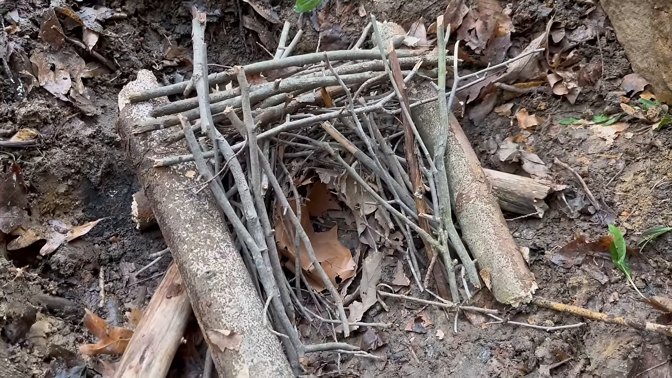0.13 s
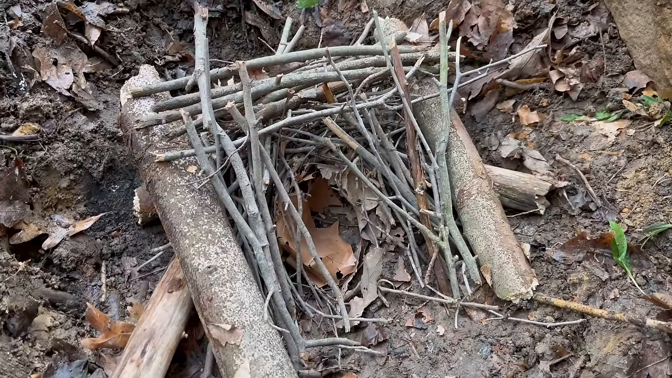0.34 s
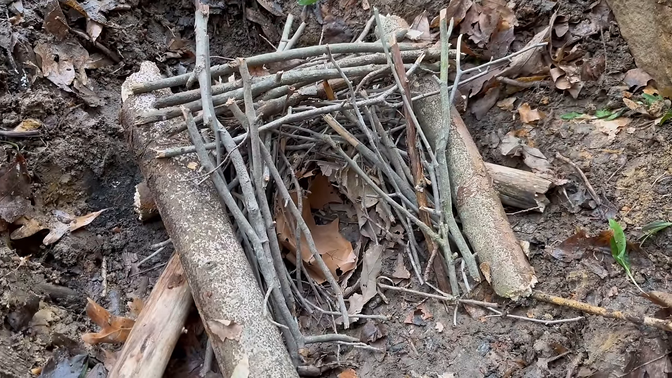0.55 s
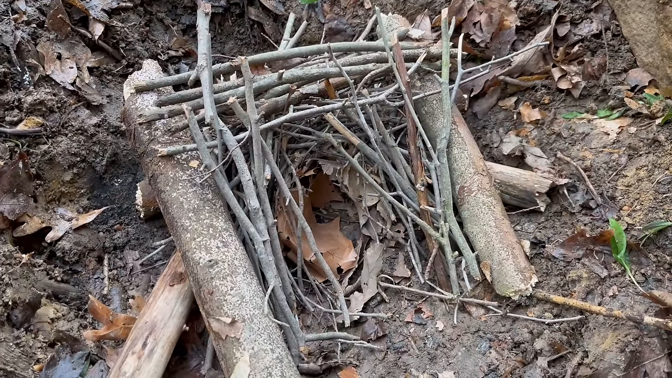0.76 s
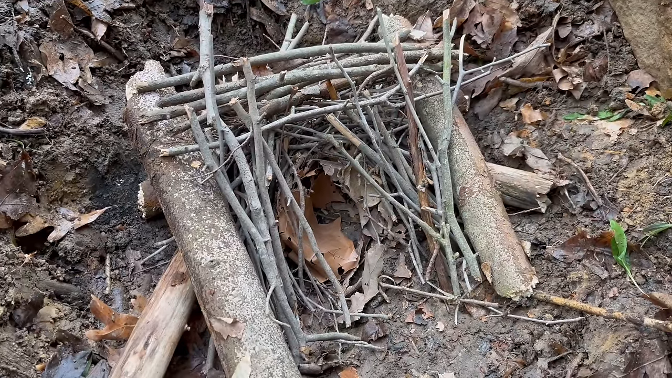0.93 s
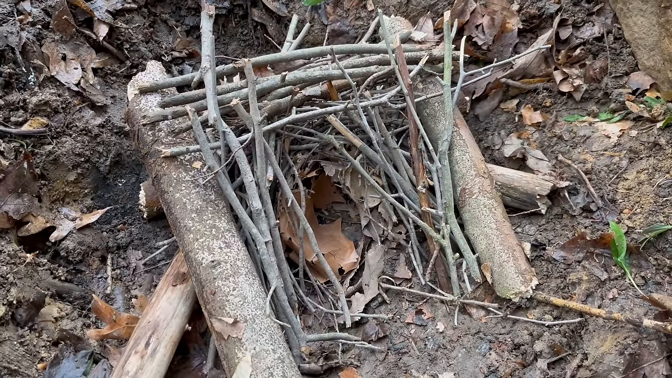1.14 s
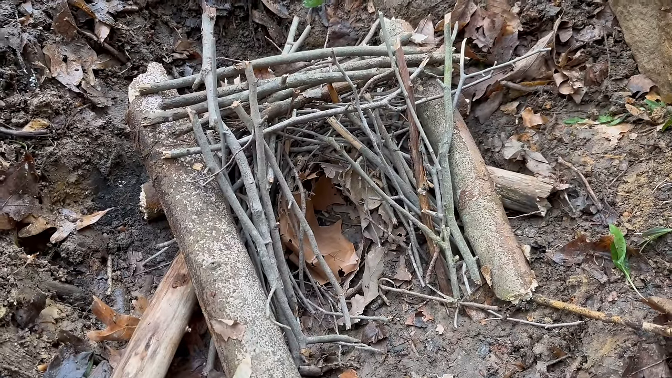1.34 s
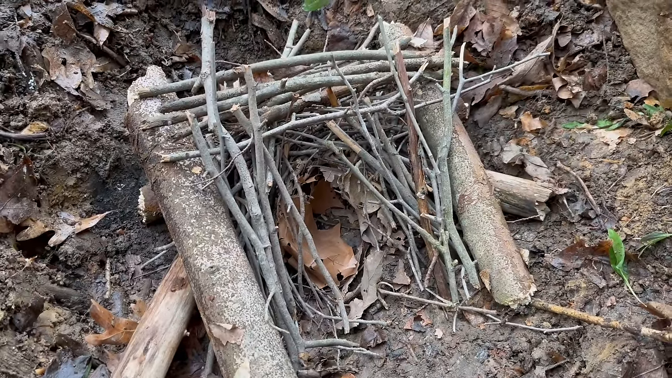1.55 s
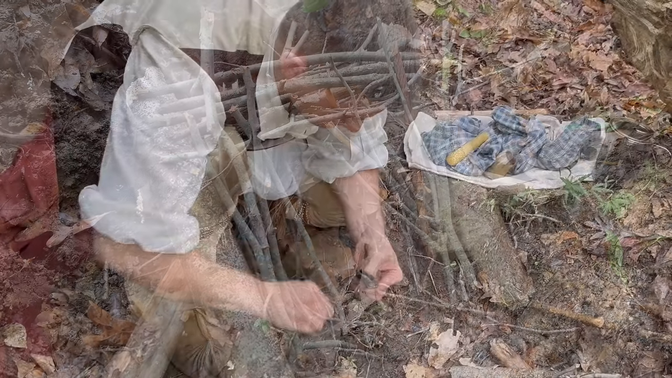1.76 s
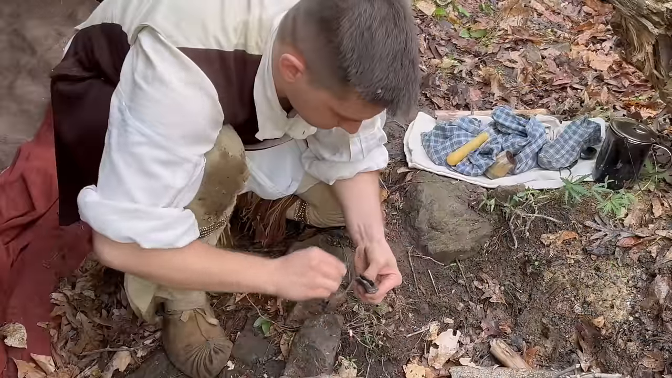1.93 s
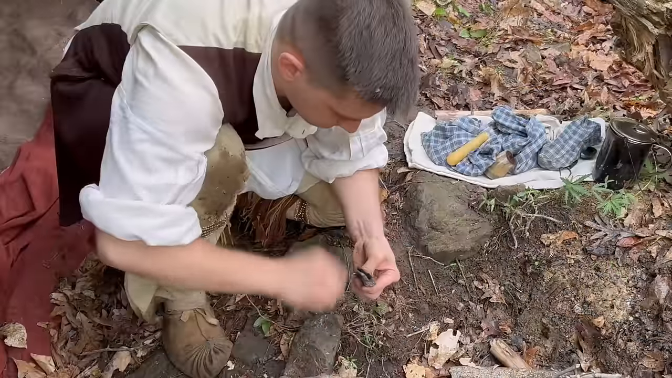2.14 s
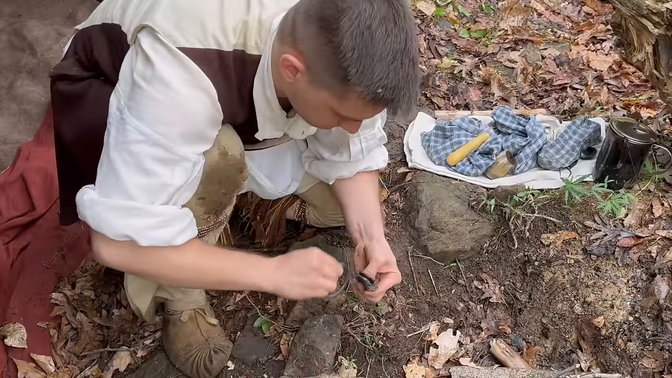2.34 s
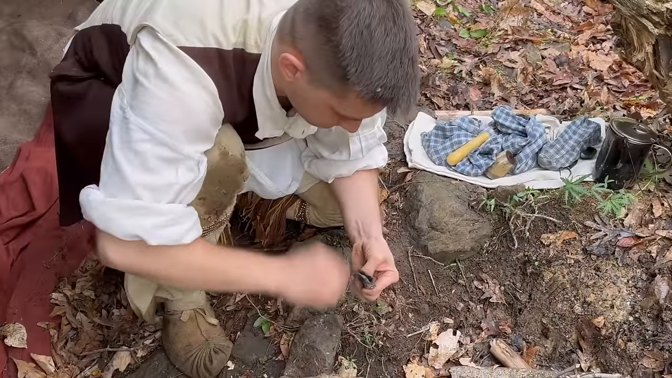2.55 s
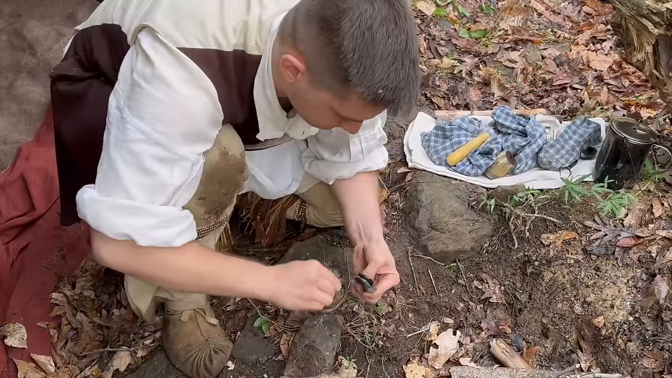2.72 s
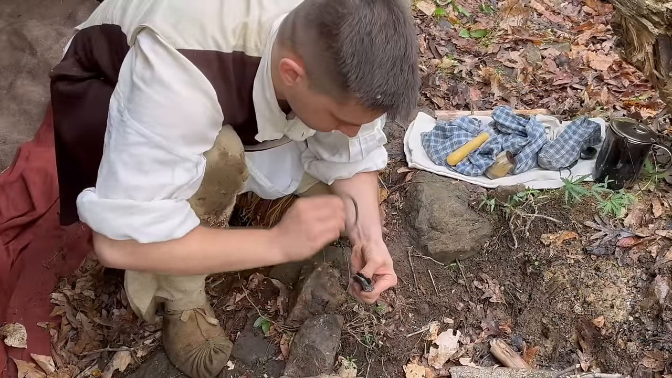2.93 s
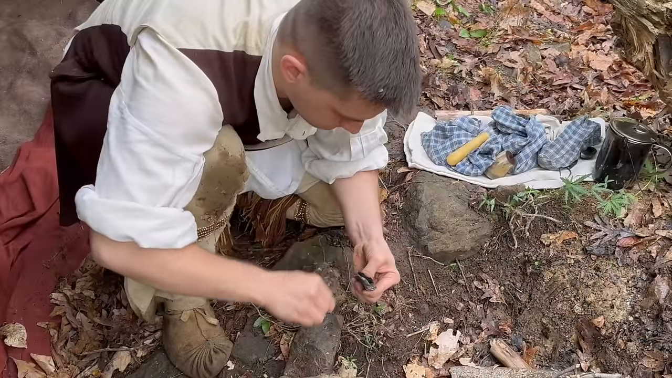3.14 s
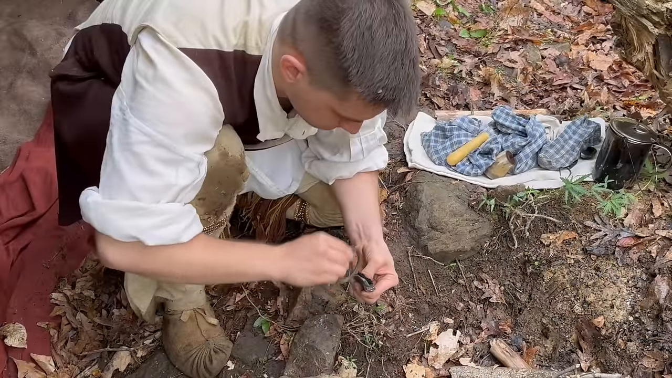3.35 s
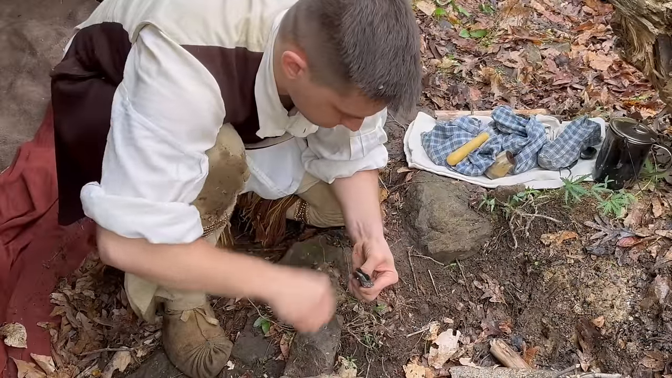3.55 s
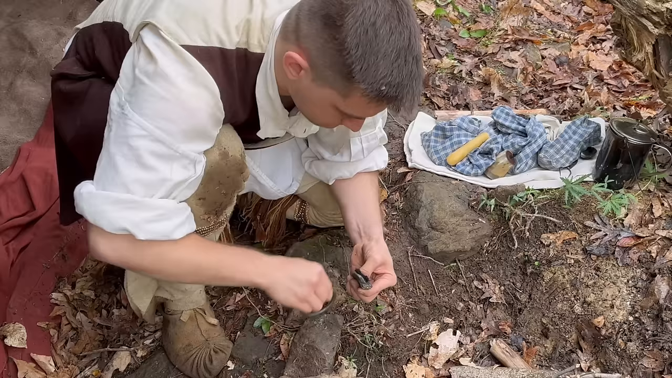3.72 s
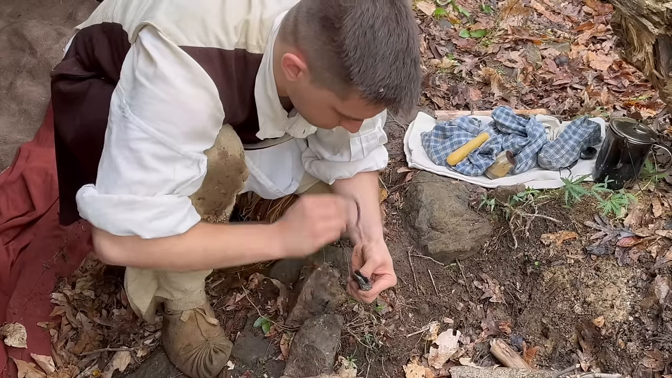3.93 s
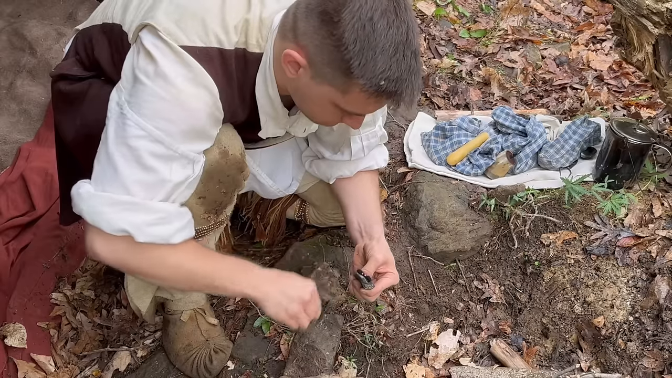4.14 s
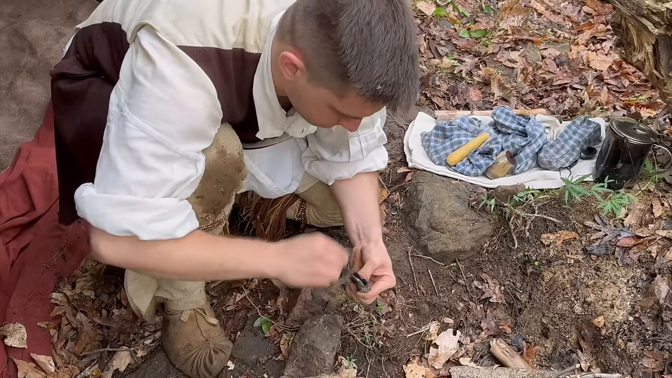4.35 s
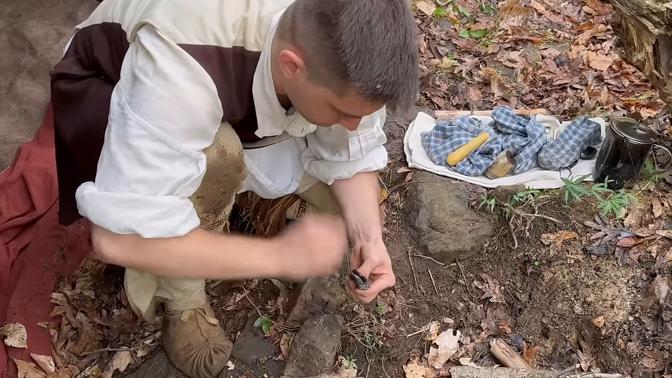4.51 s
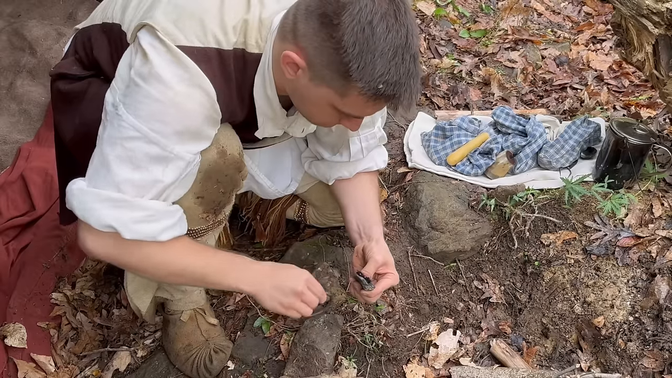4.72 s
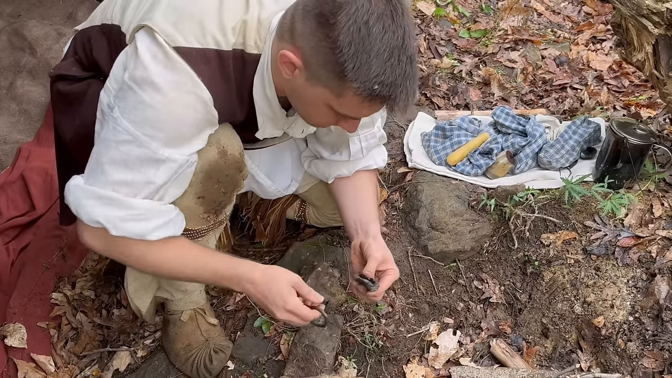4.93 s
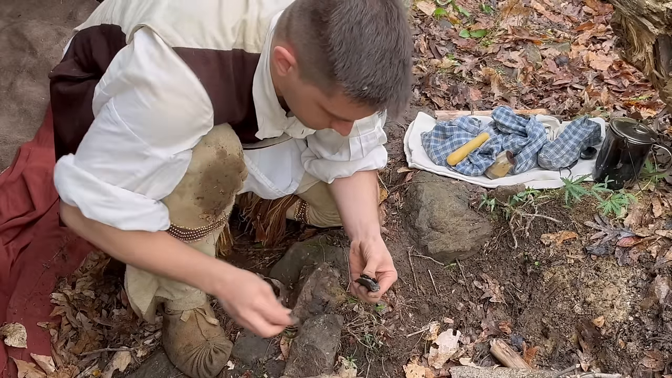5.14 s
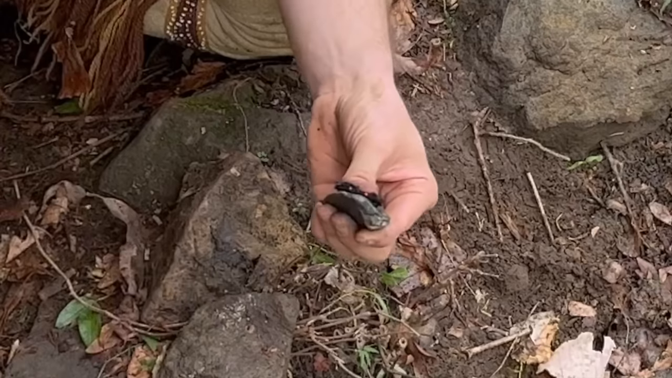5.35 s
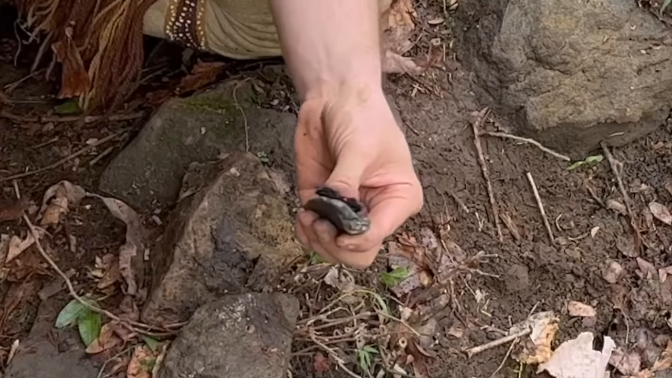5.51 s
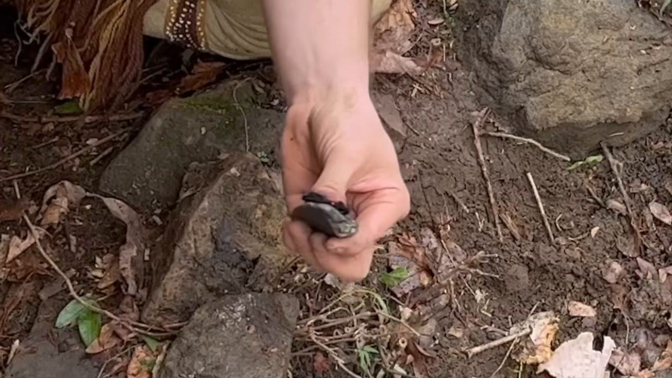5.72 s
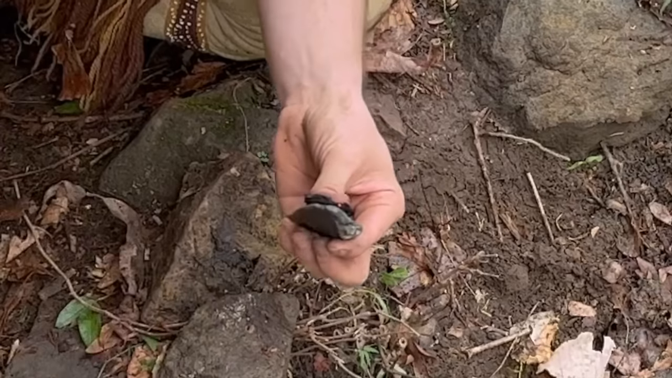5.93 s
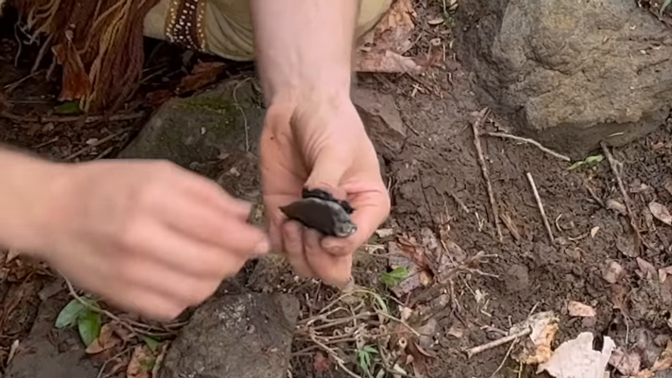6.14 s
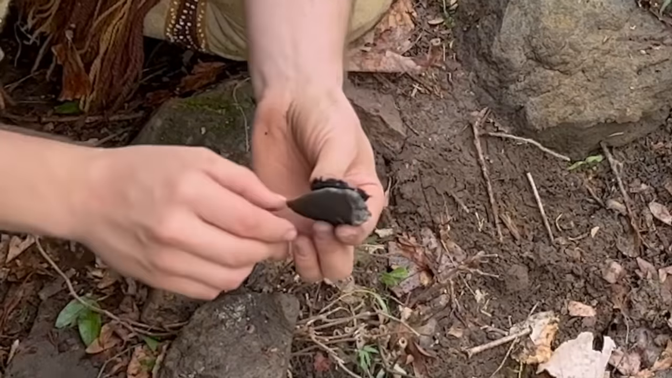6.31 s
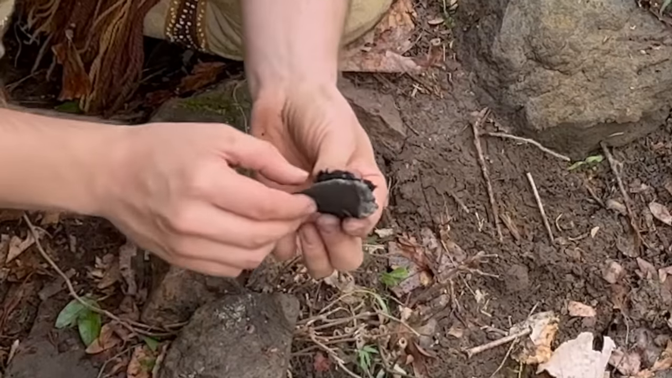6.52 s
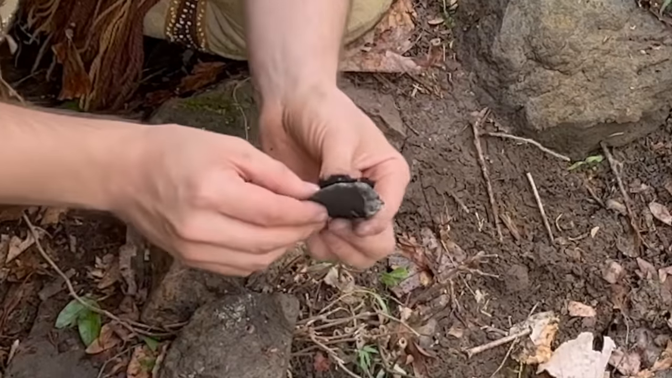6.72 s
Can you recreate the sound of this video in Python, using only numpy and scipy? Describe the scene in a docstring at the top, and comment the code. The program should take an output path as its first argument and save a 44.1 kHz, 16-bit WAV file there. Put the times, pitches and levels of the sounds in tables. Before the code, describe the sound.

Outdoors among trees, low distant traffic rumble and soft hiss lie under faint cloth and leaf rustles. A thin high bird call sounds, then steel strikes flint eight times, short, bright and scratchy, about half a second apart, with two faint touches between. Distant birds warble. After a pause, steel drops on stone and bounces. Close stereo microphone, light woodland echo.

```python
"""From the start, cloth and leaves rustle, far traffic rumbles as shaped noise and gliding tones warble as birds.
At about 1 s a thin two-voiced call sounds. From 1.2 to 4.5 s steel glances off a hand-held flint eight times:
each is a few milliseconds of noise that rings steel and flint, with a light touch after the first and the fifth.
The call returns faintly at 5.4 s, all sound dips briefly at 5.2 s, and at 5.8 s the steel drops onto stone and
bounces. Decaying noise spreads each near sound into echoes off trunks; two spaced microphone ports listen."""
import sys
import numpy as np
from scipy import signal
from scipy.fft import rfft, irfft, next_fast_len
from scipy.io import wavfile
from scipy.ndimage import uniform_filter1d

SR = 44100
rng = np.random.default_rng(int(sys.argv[2]) if len(sys.argv) > 2 else 0)


def bounce(signal):
    """Save signal as a 16-bit WAV file at the path given by the first command-line argument."""
    frames = np.transpose(np.atleast_2d(signal))
    limited = np.clip(frames, -1, 1)
    pcm = np.round(limited * 32767).astype(np.int16)
    wavfile.write(sys.argv[1], SR, pcm)


N = 303163
T = np.arange(N) / SR  # time in s
SIZE = next_fast_len(N + SR)
HZ = np.maximum(np.arange(SIZE // 2 + 1) * SR / SIZE, 1)  # pitch of each frequency bin

# Strikes of steel on flint: start_s, level_db, grating_ms, then low_db, middle_db, shrill_db and top_db
# beside the main part, first_gripped_hz, second_gripped_hz, free_ring_db
STRIKES = [(1.239, -26.5, 4.9, -18.5, -9.5, -5.5, -6, 2290, 3050, -52),
           (1.699, -28, 5.36, -12.5, -5, 0, -1, 2380, 2865, -50),
           (2.1342, -21.5, 3.5, -22, -13, -21.5, -14, 2300, 2900, -55),
           (2.569, -26.5, 2.7, -14, -11.5, 1, 1, 2504, 2900, -59),
           (3.0285, -20.5, 4.3, -17, -10.5, -6, -13.5, 2480, 3020, -59.5),
           (3.5469, -28, 5.9, -16, -8, 0, -6.5, 2370, 2940, -59.5),
           (4.036, -22.5, 3.8, -16.5, -14.5, -10, -6.5, 2450, 2900, -58.5),
           (4.5269, -24.5, 5.4, -16, -14, -11.5, -9.5, 2490, 3020, -59)]
# Light touches as the hand swings back: start_s, level_db, grating_ms, low_db, middle_db, shrill_db, top_db
TOUCHES = [(1.4788, -40, 1.3, -1, -20, -28, -30), (1.4825, -45, 0.87, 7, -13.5, -29, -22),
           (1.4865, -53.5, 1.6, 1.5, -12.5, -17, -22), (1.4885, -61.5, 11, -0.5, -9.5, -21, -7.5),
           (3.2555, -41.5, 1.6, -7.5, -21.5, -37, -31), (3.2585, -43, 1.5, -4.5, -20, -34, -33),
           (3.2612, -52.5, 12, 1.5, -13, -22, -22), (3.271, -58, 31, -3, -10, -23, -9)]
# Knocks as the steel lands on stone, skids and bounces: the same columns as the touches
STONE_KNOCKS = [(5.7955, -17.5, 1.4, 0.5, -13, -12.5, -7), (5.7988, -20, 1.5, 0, -8, -10, -16),
                (5.8025, -19.5, 1.2, -5, -10, -19, -11), (5.8075, -39, 5.3, -11.5, -6.5, -13, -13.5),
                (5.8183, -32, 1.9, -6, -22, -26, -21.5), (5.8285, -33.5, 1.5, -13.5, -15.5, -23.5, -26.5),
                (5.846, -45.5, 1.7, -8, -16, -22, -24.5), (5.876, -52, 41, -12, -9, -3.5, -3.5),
                (5.9396, -31.5, 1.2, 6.5, -21, -21, -15), (5.9475, -34.5, 1.3, 12, -20, -22, -13),
                (5.9525, -38, 1.3, 2, -22, -24, -16), (5.9605, -46, 5, -5, -20, -21, -18),
                (5.9812, -42, 1, 12.5, -24, -26, -26), (5.9951, -33, 1.8, -9, -14, -13, -11.5),
                (6.0018, -37.5, 5.4, -9.5, -20, -16, -8), (6.0085, -41, 1.6, -7, -11, -20, -15),
                (6.014, -56, 2.7, 9, -14, -20, -15)]
# Ringing tones of steel and flint damped by fingers: pitch_hz, level_db, time_to_fall_60_db_s (before a cap)
HELD_MODES = [(2300, 3, 0.026), (2900, 6, 0.015), (1030, -2.5, 0.036), (1400, -13, 0.032), (1705, 1, .03),
              (2560, -9, 0.036), (3060, -0.5, 0.015), (3300, -5.5, .025), (3660, -12.5, .021),
              (4164, -14, 0.045), (5050, 5.5, .015), (5480, -1.5, 0.067), (5860, 2, 0.022),
              (6360, 1.5, 0.029), (9123, 13.5, 0.012), (9830, 0.5, .015), (12100, -10.5, .015),
              (13700, 5.5, 0.016), (13800, -8.5, .012), (15450, -0.5, .012)]
# Ringing tones of steel lying on stone: pitch_hz, level_db, time_to_fall_60_db_s (before a cap)
LOOSE_MODES = [(1069, 5.5, 0.037), (1325, 2.5, .1), (1431, 11.5, 0.13), (1900, -4.5, 0.058),
               (2330, 3, 0.017), (2735, 2.5, 0.018), (3050, -0.5, 0.042), (3270, -1, 0.032),
               (3660, -2, 0.072), (4020, -10, 0.065), (4100, -25.5, 0.095), (5520, -5, 0.025),
               (6440, -1, 0.03), (9590, 4.5, 0.01), (10400, -2, .019), (15400, -5.5, .012)]
# Rustles of sleeve and leaves: start_s, level_db, length_ms
RUSTLE_EVENTS = [(0.01, -62, 54), (0.17, -65, 65), (1.819, -60, 38), (1.916, -78, 47), (3.82, -61, 51),
                 (3.91, -60, 43), (4.2, -71, 56.6), (4.254, -54.5, 23), (4.74, -66, 53), (6.81, -63, 93)]
# Distant warbling phrases: start_s, length_s, final_level_db, first_pitch_hz, last_pitch_hz,
# spread (share of pitch)
BIRD_PHRASES = [(0.2, 0.2, -68, 3160, 3410, 0.026), (2.03, .62, -59.5, 3460, 3790, 0.083),
                (2.55, 2.05, -55, 3660, 3450, 0.087), (2.72, 1.42, -53, 4010, 4210, 0.079),
                (4.07, .53, -53.5, 4150, 4050, .09), (3.2, 1.05, -66, 4950, 5150, .07),
                (5.515, .14, -58.5, 3200, 3450, .02), (5.44, 0.46, -66, 4000, 4260, .071),
                (6.02, .86, -63.5, 3310, 3240, 0.055), (6.02, .86, -57, 4310, 4210, 0.066)]
# Course of the thin two-voiced call: time_s, lower_hz, upper_hz, level_db
CALL_COURSE = [(0.997, 8980, 9340, -110), (1.01, 7564, 8000, -62.5), (1.05, 7330, 7300, -63.5),
               (1.112, 7206, 8600, -71.5), (1.15, 7330, 8400, -82), (1.171, 6945, 8120, -100)]
# Course of the far traffic: time_s, rumble_db, drone_db
TRAFFIC_COURSE = [(0.0, -22.5, -33), (0.15, -32, -35.5), (0.76, -28, -45), (0.88, -33, -32.5),
                  (1.09, -27, -33.5), (1.3, -33, -36.5), (1.36, -29, -46), (1.6, -32, -40.5),
                  (1.85, -37, -54), (2.22, -36.5, -41.5), (2.29, -33, -57), (2.35, -31, -47),
                  (2.58, -32.5, -38.5), (2.62, -33.5, -49), (2.89, -38, -45), (3.0, -34, -39.5),
                  (3.1, -35.5, -49.5), (3.35, -30.5, -29), (3.44, -32.5, -41), (3.5, -32, -32),
                  (3.71, -35.5, -55), (3.98, -33.5, -38), (4.02, -32.5, -46.5), (4.17, -37.5, -52),
                  (4.73, -36.5, -51), (4.86, -36, -46), (5.39, -36.5, -51), (5.66, -29.5, -42),
                  (5.68, -34.5, -46.5), (6.01, -34.5, -45.5), (6.05, -24.5, -47), (6.08, -31.5, -54.5),
                  (6.26, -33, -39.5), (6.58, -34, -38.5), (6.72, -33.5, -50), (6.87, -38.5, -53)]
# Colour of the traffic rumble: pitch_hz, relative_level_db (per Hz)
RUMBLE_COLOUR = [(15, -42.5), (26, -22), (48, -6.5), (103, 0), (145, -0.5), (194, -14), (210, -15),
                 (270, -42.5), (460, -120)]
# Colour of the traffic drone: pitch_hz, relative_level_db (per Hz)
DRONE_COLOUR = [(195, -22), (225, -10.0), (265, -1.0), (305, -5.5), (345, -33.0)]
# Colour of the higher, fainter traffic wash: pitch_hz, relative_level_db (per Hz)
WASH_COLOUR = [(190, -29.5), (330, -1.5), (366, -7), (537, -8), (599, -14), (875, -17), (1300, -37.5),
               (1690, -53.5), (2860, -120)]
# Colour of the steady background hiss, alike in both ports: pitch_hz, relative_level_db (per Hz)
HISS_MID_COLOUR = [(530, -34), (900, -9), (1210, -12), (1820, -13.5), (2900, -14), (3310, -13.5),
                   (3600, -14.5), (5130, -19.5), (7390, -26.5), (8450, -40.5), (9780, -26.5), (12200, -29),
                   (13600, -34.5), (14100, -46.5), (16500, -57.5)]
# Colour of the hiss that is opposite in the ports: pitch_hz, relative_level_db (per Hz)
HISS_SIDE_COLOUR = [(530, -32), (900, -0.5), (1940, -16.5), (3110, -18.5), (3600, -16.5), (4430, -19.5),
                    (6460, -25), (9090, -25), (10600, -28), (12200, -61.5), (16500, -58.5)]
# How far the left port leads for the hands: pitch_hz, phase_radians
HANDS_PHASE = [(0, 0), (600, -0.3), (950, 1.8), (1210, -0.4), (1460, 1.1), (1980, 0.2), (3270, 1.0),
               (4480, 0.8), (5430, -0.6), (6800, -0.8), (7670, -2.8), (12400, -6.6), (14300, -8.7),
               (16400, -9.5)]
# How far the left port leads for the stone on the ground: pitch_hz, phase_radians
GROUND_PHASE = [(0, 0), (1030, 1.4), (1380, -3.2), (1720, -5.9), (3530, -4.6), (5600, -6.6), (6550, -6.9),
                (7670, -9.3), (9130, -9.7), (10200, -11.7), (14000, -13.3), (14400, -13.1), (14600, -15.7),
                (16400, -15.7)]
# How much louder the left port is than the right: pitch_hz, difference_db
LEFT_OVER_RIGHT = [(60, 1.0), (110, 1.5), (200, 2.5), (380, 0.0), (700, 2.0), (1290, 0.0), (2380, -0.5),
                   (4400, 2.0), (8120, 0.0), (15000, 0.0)]

# Limits between the low, main, middle, shrill and top parts of a contact
HELD_PARTS_HZ, LOOSE_PARTS_HZ = [2100, 4700, 8000, 11500], [1200, 4450, 8000, 11500]
RING_HZ, RING_WIDTH_HZ, RING_T60_S = 5660, 270, .3  # free end of the steel; T60 is the time to fall 60 dB
CHORUS = 8  # singers to a phrase
SWELL_DB_PER_S, SONG_RISE_SHARE, SONG_FADE_S = 3, .15, .049
CALL_AGAIN_S, CALL_AGAIN_DB = 4.4, -15  # the same call later and fainter
WASH_DB = -54.5  # level of the wash beside a rumble of -35 dB
WASH_FOLLOWS = 1.2  # dB that the wash rises for each dB of rumble
SLAP_S, SLAP_DB = .065, -35  # one nearer bank answers with a dull slap
BLUR_HZ = 500  # the echoes blur the rings by about this much
DIP_S, DIP_WIDTH_S = 5.22, .005
TOP_HZ = 16800  # the recorder cuts what lies above


def contacts(events, modes, parts_hz, grit_db, scrape_s, lead_in_db, after_db, shift,
             longest_s=.055, bass_hz=920, order=7):
    """A hail of tiny collisions and a fainter scrape ring every mode and are also heard as grit."""
    out, t = np.zeros(N), np.arange(SR // 6) / SR
    scatter_db = 2.5  # each contact excites the modes a little differently
    lead_s = .012  # a faint rising noise before each contact
    shrill_share = .65  # part of the bite hard enough for the shrill and top modes
    since_bite = np.maximum(t - lead_s, 0)
    hz, mode_db, t60 = np.transpose(modes)
    # nothing rings long against skin or stone, least the high modes
    t60 = np.minimum(t60, np.minimum(longest_s, 210 / hz))
    group = np.searchsorted(parts_hz, hz)
    edges = zip([900, *parts_hz], [*parts_hz, 14300])
    bands = [signal.butter(3, edge, "bandpass", fs=SR, output="sos") for edge in edges]
    lead_in = undb(lead_in_db) * (t < lead_s) * (t / lead_s) ** 2
    onset = np.minimum(since_bite / .00045, 1)
    scrape = undb(after_db) * np.exp(-since_bite / scrape_s)

    for s, db, ms, low_db, middle_db, shrill_db, top_db, *gripped_hz in events:
        grains = rng.standard_normal((5, len(t))) * undb(2.5 * rng.standard_normal(len(t)))
        hails = []
        for grain, share in zip(grains, (1, 1, 1, shrill_share, shrill_share)):
            # even pressure while the edge bites, then a quick release
            bite = np.exp(-(since_bite / (share * ms / 1000)) ** 3)
            hails.append(grain * ((share == 1) * lead_in + onset * (bite + scrape)))

        chance = rng.standard_normal((3, len(hz)))
        group_db = np.array([low_db, 0, middle_db, shrill_db, top_db])
        # the grip sets the first modes if given; all shift a little from contact to contact
        detuned = np.r_[gripped_hz, hz[len(gripped_hz):]] * (1 + shift * chance[0])
        split = .006 * hz * (1 + .3 * chance[2])  # each mode is a close pair that beats
        parts = []
        for g, f, beat, decay in zip(group, detuned, split, t60):
            tone = np.sin(2 * np.pi * f * t) * np.cos(2 * np.pi * beat * t)
            ring = tone * np.exp(-np.log(1000) * t / decay)
            parts.append(signal.fftconvolve(hails[g], ring)[:len(t)])
        parts += [signal.sosfilt(band, hail) for band, hail in zip(bands, hails)]
        gains_db = [*(mode_db + group_db[group] + scatter_db * chance[1]), *(grit_db + group_db)]

        # each part gets the same energy before its own gain
        energy = ms / 1000 * SR
        mixed = sum(undb(g) * p * np.sqrt(energy / np.sum(p ** 2)) for g, p in zip(gains_db, parts))
        add(out, s - lead_s, undb(db) * mixed)
    # hand-sized things radiate no bass
    return signal.sosfilt(signal.butter(order, bass_hz, "highpass", fs=SR, output="sos"), out)


def strikes():
    """Steel glances hard off the flint, and the grip sets the two first modes of each strike."""
    grit_db = np.array([-6.5, -1.5, 10.5, 2.5, 3])
    return contacts([row[:-1] for row in STRIKES], HELD_MODES, HELD_PARTS_HZ, grit_db, .0088,
                    lead_in_db=-22.0, after_db=-7.5, shift=.01)


def rings():
    """The free end of the steel shivers on after a strike: a close cluster of tones that dies slowly."""
    out, t = np.zeros(N), T[:SR // 3]
    for s, *_, db in STRIKES:
        chance = rng.random((4, 2))
        hz = RING_HZ + RING_WIDTH_HZ * (chance[:, :1] - .5)
        cluster = np.sin(2 * np.pi * (hz * t + chance[:, 1:])).sum(axis=0)
        add(out, s, undb(db) * cluster * np.exp(-np.log(1000) * t / RING_T60_S))
    return out


def touches():
    """Steel brushes the flint lightly as the hand swings back, with a fainter scrape after each bite."""
    grit_db = np.array([4.9, 14.0, 5.8, 3.3, 3])
    return contacts(TOUCHES, HELD_MODES, HELD_PARTS_HZ, grit_db, .013,
                    lead_in_db=-25.5, after_db=-17.0, shift=.022)


def drop_on_stone():
    """Loose steel rings longer than held steel; a very faint noise swells for 12 ms before each knock."""
    grit_db = np.array([-6, -16.5, 4, 9.0, -1.0])
    return contacts(STONE_KNOCKS, LOOSE_MODES, LOOSE_PARTS_HZ, grit_db, .024, lead_in_db=-30,
                    after_db=-18.0, shift=.003, longest_s=.1, bass_hz=884, order=3)


def rustles():
    """Cloth and dry leaves make a soft bright crackle: short swells of filtered noise."""
    out = np.zeros(N)
    for s, db, ms in RUSTLE_EVENTS:
        n = int(ms / 1000 * SR)
        add(out, s, undb(db) * np.hanning(n) * rng.standard_normal(n))
    return signal.sosfilt(signal.butter(2, [5200, 14500], "bandpass", fs=SR, output="sos"), out)


def warbling():
    """A far chorus of fast gliding notes, each singer blurred to a shimmer by other trees."""
    songs = np.zeros((CHORUS, N))
    for s, length, db, first_hz, last_hz, spread in BIRD_PHRASES:
        t = T[int(s * SR):int((s + length + 5 * SONG_FADE_S) * SR)]
        hz = np.interp(t, [s, s + length], [first_hz, last_hz])
        left_s = s + length - t
        # a phrase fades in, swells to its end and dies away
        rise = np.clip((t - s) / (SONG_RISE_SHARE * length), 0, 1)
        swell = undb(db - SWELL_DB_PER_S * np.maximum(left_s, 0))
        shape = rise * swell * np.exp(np.minimum(left_s, 0) / SONG_FADE_S)
        for song in songs:
            wavering_hz = hz * (1 + spread * walk(90, size=len(t)))
            note = np.sin(2 * np.pi * np.cumsum(wavering_hz) / SR)
            add(song, s, shape * np.sqrt(2 / CHORUS) * note)
    return sum(trunks(song, .15, .0014) for song in songs)


def thin_call():
    """A nearer bird sings two unsteady tones at once, then the same call again; the trunks echo both."""
    s, low_hz, high_hz, db = np.transpose(CALL_COURSE)
    voices = np.zeros(N)
    for pitch in (low_hz, high_hz):
        wavering_hz = np.interp(T, s, pitch) * (1 + .0056 * walk(120))
        voices += np.sin(2 * np.pi * np.cumsum(wavering_hz) / SR)
    call = voices * undb(np.interp(T, s, db, left=-140, right=-140))
    call += undb(CALL_AGAIN_DB) * np.roll(call, int(CALL_AGAIN_S * SR))
    return pair(.22 * call, call) + trunks(call, .24, .013)


def traffic():
    """Far traffic is rumble, a wavering drone and a higher, fainter wash; the lower, the more alike in both."""
    s, *columns = np.transpose(TRAFFIC_COURSE)
    rumble_db, drone_db = (np.interp(T, s, column) for column in columns)
    wash_db = WASH_DB + WASH_FOLLOWS * (uniform_filter1d(rumble_db, SR // 2) + 35)
    # the part that differs between the ports grows with pitch
    rumble_side = [(hz, db + 5.5 * np.log2(hz / 100)) for hz, db in RUMBLE_COLOUR]
    rumble = pair(coloured(RUMBLE_COLOUR), undb(-18.5) * coloured(rumble_side))
    drone = pair(coloured(DRONE_COLOUR), undb(-10.5) * coloured(DRONE_COLOUR))
    wash = pair(coloured(WASH_COLOUR), undb(-2.5) * coloured(WASH_COLOUR))
    rumble = undb(rumble_db + .47 * walk(10)) * rumble
    drone = undb(drone_db + 1.0 * walk(5.3)) * drone
    wash = undb(wash_db + 2.0 * walk(11)) * wash
    return (rumble + drone + wash) * undb(np.array([[.6], [-.6]]))  # a little louder on the left


def hiss():
    """A steady background hiss: noise that is partly alike and partly opposite in the two ports."""
    return pair(level(coloured(HISS_MID_COLOUR), -66.5), level(coloured(HISS_SIDE_COLOUR), -64.5))


def ports(x, phase):
    """A near source reaches the two ports with a phase and level difference that depends on pitch."""
    half = undb(over_hz(LEFT_OVER_RIGHT) / 2) * np.exp(.5j * over_hz(phase))
    spectrum = rfft(x, SIZE)
    return np.array([irfft(spectrum * half, SIZE)[:N], irfft(spectrum / half, SIZE)[:N]])


def trunks(x, t60, delay_s):
    """Trunks scatter sound into a decaying noise tail of unit energy, another for each port."""
    t = np.arange(SR // 2) / SR
    shape = np.exp(-np.log(1000) * t / t60) * (1 - np.exp(-(t / delay_s) ** 2))
    tails = rng.standard_normal((2, len(t))) * shape / np.sqrt(np.sum(shape ** 2))
    return signal.fftconvolve(x[None], tails, axes=1)[:, :N]


def echoes(near):
    """Trunks and one nearer bank send near sounds back, dulled because bark and leaves swallow treble."""
    blurred = near.mean(axis=0) * walk(rate=BLUR_HZ)
    dulled = signal.sosfilt(signal.butter(1, 12000, fs=SR, output="sos"), blurred)
    slap = np.roll(dulled, int(SLAP_S * SR))
    slap = signal.sosfilt(signal.butter(2, 4000, fs=SR, output="sos"), slap)
    return undb(-26.0) * trunks(dulled, .33, .035) + undb(SLAP_DB) * trunks(slap, .09, .012)


def undb(db):
    """Decibels to gain."""
    return 10 ** (np.asarray(db) / 20)


def level(x, db):
    """Scale to an rms (average strength) level."""
    return x * undb(db) / np.sqrt(np.mean(x ** 2))


def over_hz(table):
    """Read a table of pitch and value at every frequency bin."""
    hz, value = np.transpose(table)
    return np.interp(np.log(HZ), np.log(np.maximum(hz, 1)), value)


def coloured(spectrum):
    """Noise of rms 1 with the given spectrum, silent outside it."""
    inside = (HZ > spectrum[0][0]) & (HZ < spectrum[-1][0])
    shaped = rfft(rng.standard_normal(SIZE)) * undb(over_hz(spectrum)) * inside
    return level(irfft(shaped, SIZE)[:N], 0)


def walk(rate, size=N):
    """Random levels, rate of them each second, joined by slopes; spread near 1."""
    k = int(SR / rate)
    steps = np.repeat(rng.standard_normal(size // k + 1), k)
    return 1.1 * uniform_filter1d(steps, k)[:size]


def pair(mid, side):
    """Left and right from common and opposite parts."""
    return np.array([mid + side, mid - side])


def add(out, s, piece):
    """Mix a piece in at time s."""
    i = int(s * SR)
    out[i:i + len(piece)] += piece[:N - i]


def scene():
    """Hands and stone near the ports, their echoes, and the background behind."""
    hands = strikes() + rings() + touches() + rustles()
    near = ports(hands, HANDS_PHASE) + ports(drop_on_stone(), GROUND_PHASE)
    background = warbling() + thin_call() + traffic() + hiss()
    dip = 1 - np.exp(-((T - DIP_S) / DIP_WIDTH_S) ** 2)  # all sound dips briefly
    return dip * (near + echoes(near) + background)


def record(dry):
    """The microphone loses deep bass and top treble; the recorder clips just under full scale, then cuts."""
    fade_in = np.minimum(T / .004, 1)
    heard = signal.sosfilt(signal.butter(2, 32, "highpass", fs=SR, output="sos"), dry * fade_in)
    heard = signal.sosfilt(signal.butter(6, 16000, fs=SR, output="sos"), heard)
    clipped = np.clip(heard, -.95, .95)
    return signal.sosfilt(signal.ellip(14, .2, 100, TOP_HZ, fs=SR, output="sos"), clipped)


dry = scene()
out = record(dry)
bounce(out)
```